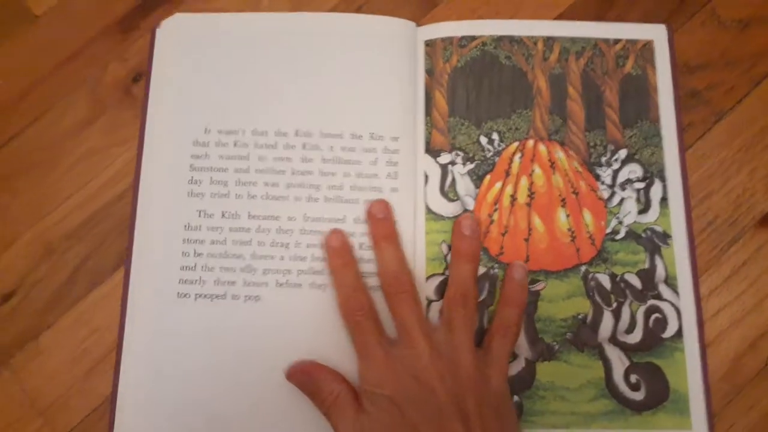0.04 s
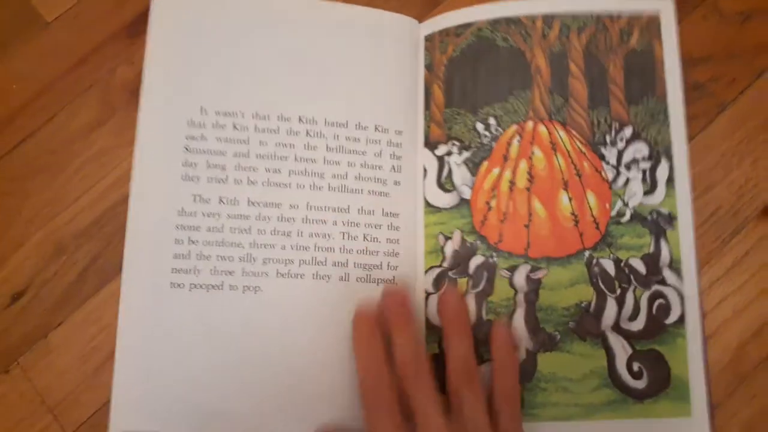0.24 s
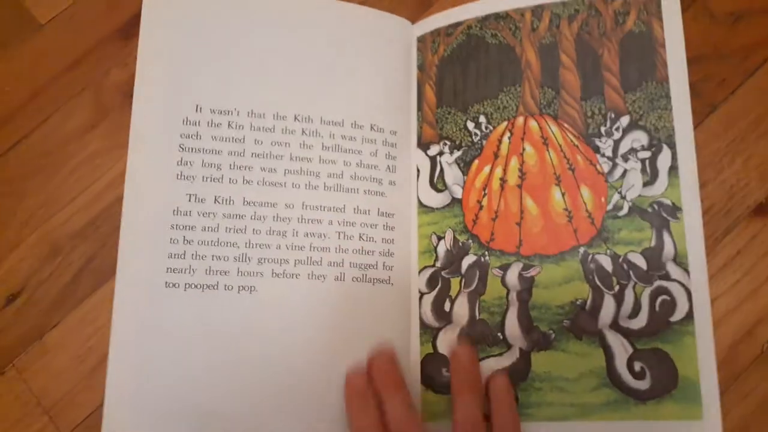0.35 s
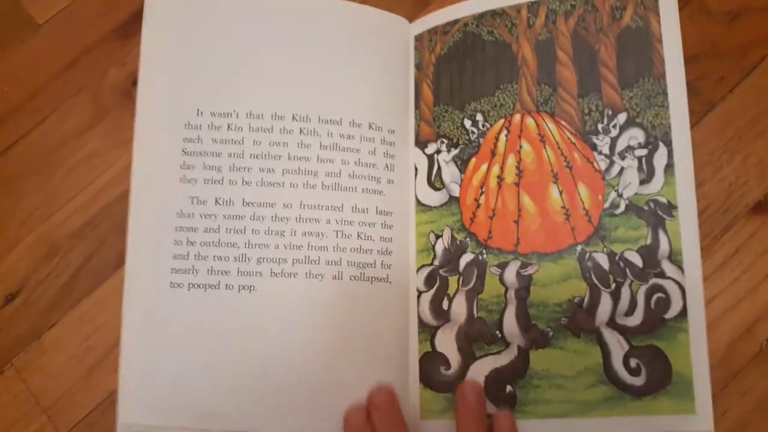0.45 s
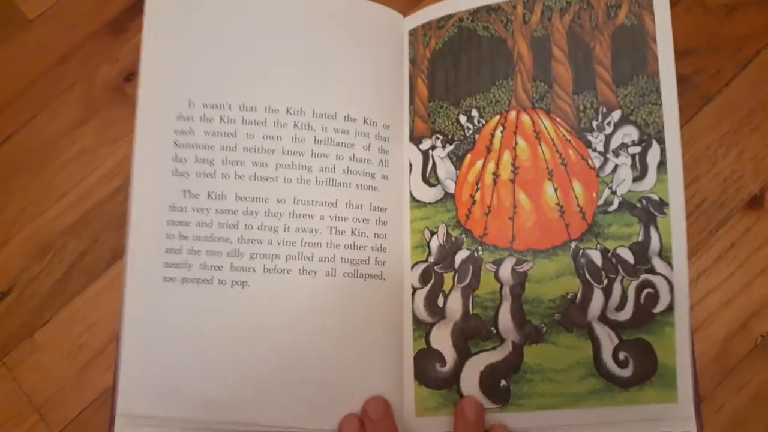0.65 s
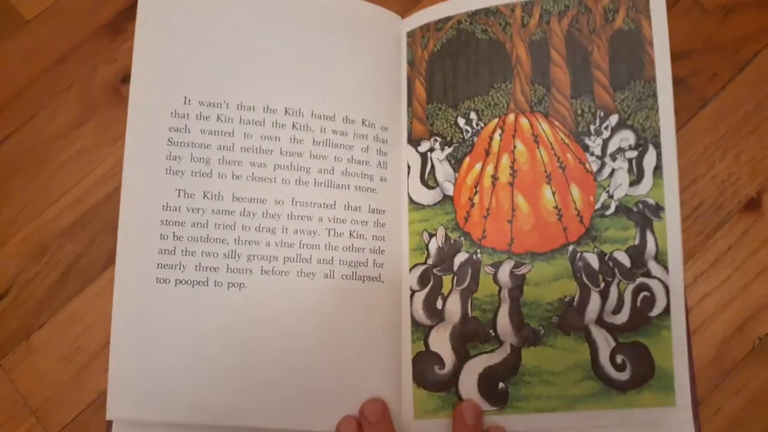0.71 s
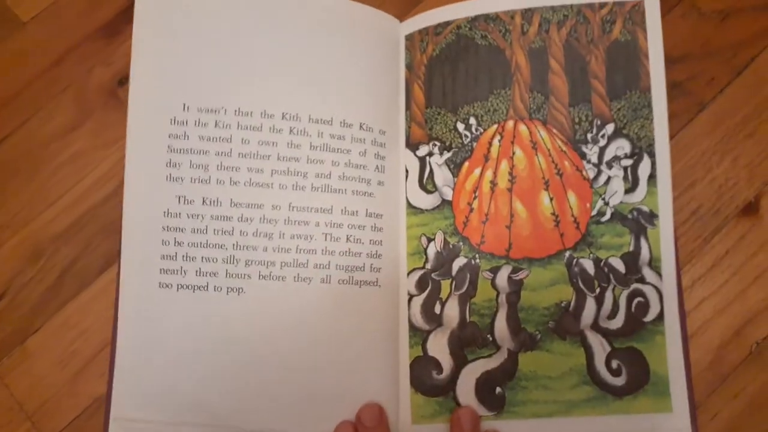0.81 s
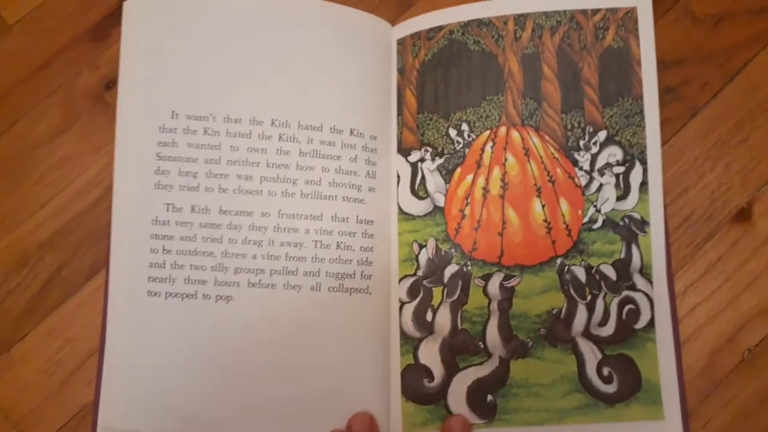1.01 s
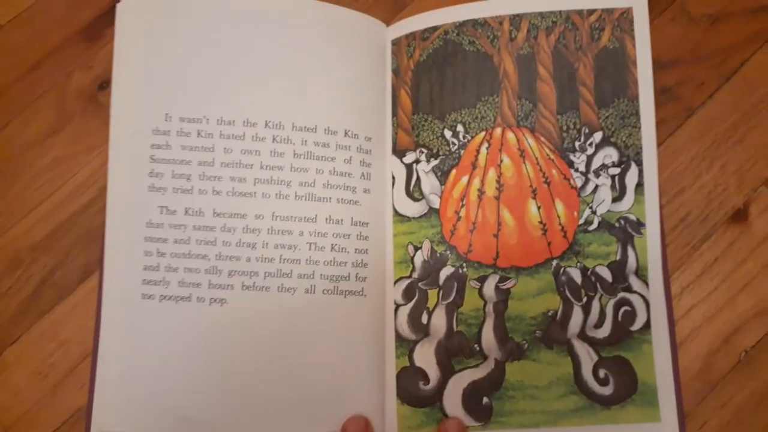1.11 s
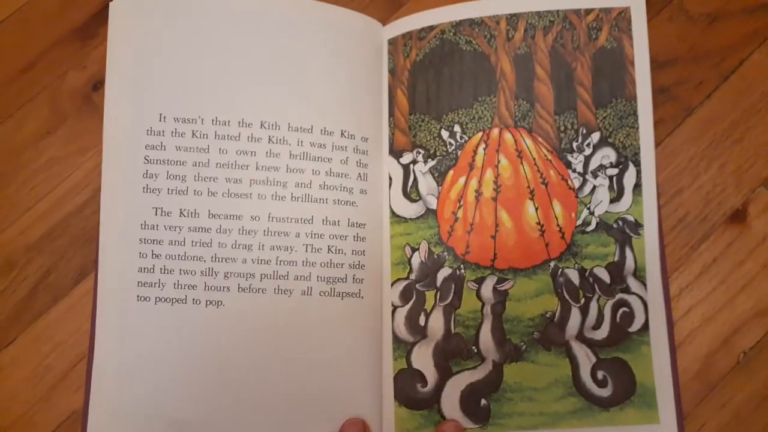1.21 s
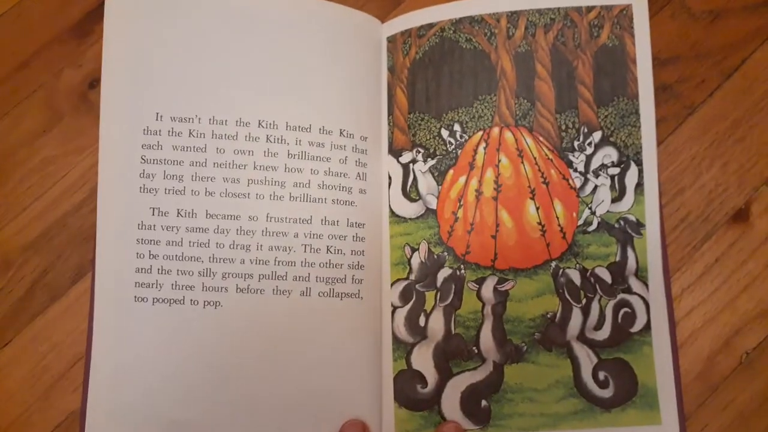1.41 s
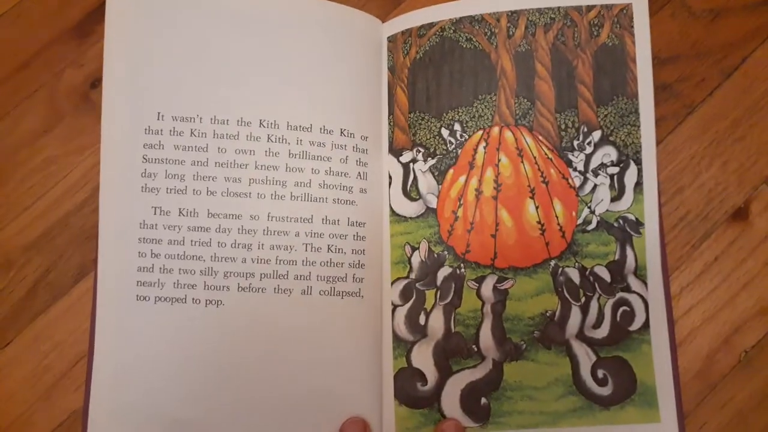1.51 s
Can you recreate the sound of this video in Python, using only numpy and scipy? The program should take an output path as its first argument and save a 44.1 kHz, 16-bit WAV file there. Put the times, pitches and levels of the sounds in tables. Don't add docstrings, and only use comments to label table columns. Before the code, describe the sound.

Close up in a small quiet room, a brief skin-on-paper swish carries two main hollow book thumps with page slaps, followed by a faint shift, small plastic ticks at left and a soft final creak over distant appliance hum.

```python
import sys
import numpy as np
from scipy import signal
from scipy.fft import rfft, irfft
from scipy.io import wavfile

SR = 44100
rng = np.random.default_rng(int(sys.argv[2]) if len(sys.argv) > 2 else 0)


def undo_db(level):
    steps = np.asarray(level, float) / 20
    return 10 ** steps


def dump_mix(stems):
    frames = np.atleast_2d(stems).T
    limited = np.clip(frames, -1, 1)
    pcm = np.round(limited * 32767).astype(np.int16)
    wavfile.write(sys.argv[1], SR, pcm)


N = 68355
HZ = np.maximum(np.fft.rfftfreq(N, 1 / SR), 1)

# added to
# the modes well above 900 Hz, taken from those well below.
KNOCKS = [(0.001, -53, 2580, 0), (0.039, -48.5, 3460, 5), (0.0558, -36, 2120, -4), (0.059, -47.5, 4500, -8),
          (0.08, -46.5, 2560, -1), (0.1612, -36.5, 800, -6.5), (0.198, -44, 1184, -6),
          (0.2015, -36, 1100, 7), (0.2299, -13.5, 2300, 2), (0.2335, -15.5, 660, -12.5),
          (0.2366, -13, 3010, 8.5), (0.2549, -18.5, 1580, -2), (0.265, -31, 990, -13),
          (0.272, -25, 1310, -0.5), (0.3162, -13, 1100, 6), (0.3205, -24.5, 1060, 7),
          (0.328, -37, 1800, 9.5), (0.333, -29, 1810, 0.5), (0.369, -37, 1020, 5), (0.3755, -31, 970, 10.5),
          (0.386, -45, 1200, 3), (0.398, -44, 1190, 6), (0.679, -42, 1220, -0.5)]


def rms_one(x):
    return x / np.sqrt(np.mean(x ** 2) + 1e-20)


def at_hz(points):
    hz, value = np.transpose(points)[:2]
    return np.interp(np.log(HZ), np.log(hz), value)


def coloured(x, gain):
    return irfft(rfft(x) * gain, N)


def left_right(db):
    return undo_db([[db / 2], [-db / 2]])


def high_pass(x, order, hz):
    return signal.sosfilt(signal.butter(order, hz, "high", fs=SR, output="sos"), x)


def drift(rate_hz):
    r = np.exp(-2 * np.pi * rate_hz * 40 / SR)
    noise = rng.standard_normal(N // 40 + 2002)
    slow = signal.lfilter([1], [1, -2 * r, r * r], noise)[2000:]
    return np.interp(np.arange(N) / 40, np.arange(len(slow)), rms_one(slow))


def ring(clicks, hz, t60):
    r = undo_db(-60 / (t60 * SR))
    w = 2 * np.pi * hz / SR
    return signal.lfilter([0, np.sin(w)], [1, -2 * r * np.cos(w), r * r], clicks + 1e-18)


def contact(s, db, cut_hz):
    click = np.zeros(N)
    click[min(int(s * SR), N - 1)] = undo_db(db)
    r = np.exp(-2 * np.pi * cut_hz / SR)
    return signal.lfilter([(1 - r) ** 2], [1, -2 * r, r * r], click + 1e-18)


def struck(rows, modes, rise_s, spread_db):
    hits = np.array([contact(s, db, cut_hz) for s, db, cut_hz, _ in rows])
    octaves = np.clip(np.log2(np.array(modes)[:, 0] / 900), -0.2, 0.2) * 5
    lean_db = np.outer([row[3] for row in rows], octaves)
    chance_db = spread_db * rng.standard_normal((len(rows), len(modes)))
    drive = undo_db(lean_db + chance_db).T @ hits
    swell = 1 / (np.log(1000) * rise_s)
    tracks = []
    for x, mode in zip(drive, modes):
        hz, db, t60 = mode[:3]
        rise = ring(x, hz, 1 / (1 / t60 + swell))
        tracks.append(undo_db(db) * (ring(x, hz, t60) - rise))
    return np.array(tracks)


def room(x):
    t60_s, high_t60_s, wall_cut_hz, build_s = 0.34, 0.24, 1200, 0.0083
    likeness = 0.55
    t = np.arange(SR // 2) / SR
    shared, left, right = rng.standard_normal((3, SR // 2))
    echoes = np.sqrt(likeness) * shared + np.sqrt(1 - likeness) * np.array([left, right])
    low = signal.sosfilt(signal.butter(1, wall_cut_hz, fs=SR, output="sos"), echoes)
    dying = low * undo_db(-60 * t / t60_s) + (echoes - low) * undo_db(-60 * t / high_t60_s)
    dying = dying * np.clip(t / build_s, 0, 1)
    return signal.fftconvolve(x[None], dying / np.sqrt(0.03 * SR), axes=1)[:, :N]


def air(spectrum, db, lead_rad):
    # frequency in Hz, left-right balance in dB.
    air_side = [(60, -5), (130, 7.5), (290, -11), (640, -3), (1410, -11.5), (3100, -1.5), (6820, -4),
                (15000, 0.5)]
    # frequency in Hz, likeness of the two microphones from 0 to 1.
    likeness = [(60, 1), (180, 0.85), (550, 0.91), (1650, 0), (4970, 0.25), (15000, 0.08)]
    mid, side = rng.standard_normal((2, N))
    alike = np.clip(at_hz(likeness), 0, 0.99)
    pair = []
    for sign in (1, -1):
        gain = undo_db(at_hz(spectrum)) * undo_db(sign * at_hz(air_side) / 2)
        common = coloured(mid, gain * np.sqrt(1 + alike) * np.exp(0.5j * sign * lead_rad))
        pair.append(common + sign * coloured(side, gain * np.sqrt(1 - alike)))
    return undo_db(db) * rms_one(np.array(pair))


def rumble():
    # frequency in Hz, density in dB per Hz.
    rumble_spectrum = [(25, -29.5), (55, -5), (90, 4), (135, -9.5), (290, -7.5), (400, -15), (950, -14.5),
                       (1700, -58.5)]
    return air(rumble_spectrum, db=-57.5, lead_rad=0.78) * undo_db(1 * drift(9.5))


def high_air():
    # frequency in Hz, density in dB per Hz.
    air_spectrum = [(600, -31), (1100, 0.5), (1400, -6), (2300, -11), (3000, -14.5), (8000, -30),
                    (12000, -22.5), (16000, -18)]
    return air(air_spectrum, db=-72, lead_rad=0)


def hum():
    # frequency in Hz, rms level in dB, wander in dB, left-right balance in dB,
    # lead of the left microphone in radians.
    tones = [(103.2, -57.5, .8, 0, .6), (207, -68.5, 1.5, -3, .3), (276, -73, 1.2, -2, .3),
             (414, -77, 1.5, -4, .3), (620, -79, 1.5, -4, .3), (1017.6, -74, .4, -9, .3)]
    # time in seconds, rms level of the load tone in dB.
    load = [(0.0, -69), (0.112, -57.5), (0.358, -66.5), (0.388, -73), (0.574, -70.5), (0.594, -82),
            (0.682, -64), (0.702, -75), (1.112, -62), (1.164, -82), (1.234, -58.5), (1.32, -77),
            (1.364, -65.5), (1.55, -68.5)]
    load_hz, load_gain_db = 307.5, 3.5
    t = np.arange(N) / SR
    out = 0
    for hz, db, wander_db, side_db, lead in tones:
        turn = 2 * np.pi * hz * t + 0.2 * wander_db * drift(2)
        level = undo_db(db + 2 + wander_db * drift(1.9))
        out = out + level * left_right(side_db) * np.sin([turn + lead, turn])
    load_level = undo_db(load_gain_db + np.interp(t, *np.transpose(load)))
    load_tone = np.sin(2 * np.pi * load_hz * t + 0.83 * drift(2.7))
    return out + load_level * undo_db([[-1], [1]]) * load_tone


def casing():
    # start in seconds, peak in dB.
    tick_rows = [(.018, -68), (.027, -68), (.483, -68), (.528, -63), (.534, -63), (.54, -64), (.551, -68),
                 (.572, -64), (.589, -68), (.674, -62), (.69, -63), (.777, -69), (.879, -66), (.948, -69),
                 (1.186, -65), (1.202, -66), (1.288, -65), (1.304, -67), (1.33, -66), (1.391, -68),
                 (1.458, -66), (1.465, -62), (1.471, -66), (1.492, -61), (1.498, -60), (1.504, -64),
                 (1.526, -61), (1.532, -59), (1.538, -63), (1.547, -61)]
    # frequency in Hz, level in dB, t60 in seconds.
    plastic = [(1300, -10, .003), (1900, -7, .003), (2400, -2, .005), (3000, -3, .004), (3700, -3, .004),
               (5200, -7, .003), (6300, -8, .003), (8000, -14, .003)]
    creak_from_s, creak_db = 1.45, 4
    tick_cut_hz, creak_cut_hz = 9000, 3200
    tick_db, right_db, room_db = 3.5, -35, -8
    rows = []
    for s, db in tick_rows:
        if s > creak_from_s:
            rows.append((s, db + creak_db, creak_cut_hz, 0))
        else:
            rows.append((s, db, tick_cut_hz, 0))
    tracks = struck(rows, plastic, rise_s=0.00016, spread_db=7)
    ticks = tracks.sum(axis=0) * undo_db(tick_db)
    return ticks * undo_db([[0], [right_db]]) + undo_db(room_db) * room(ticks)


def thuds():
    # start in seconds, peak in dB, frequency in Hz.
    pushes = [
        (0.159, -50, 260),
        (0.234, -36, 184),
        (0.264, -46, 291),
        (0.292, -45, 156),
        (0.31, -42, 272),
        (0.329, -43.5, 99.4),
        (0.338, -42.5, 184),
        (0.344, -48.5, 72.3),
        (0.802, -42.5, 175.6),
        (0.806, -49, 251),
    ]
    rise_cycles, t60_cycles = 1.17, 15.3
    low = 0
    for s, db, hz in pushes:
        cycles = np.maximum(np.arange(N) / SR - s, 0) * hz
        swell = 1 - np.exp(-cycles / rise_cycles)
        low = low + undo_db(db + 2 - 60 * cycles / t60_cycles) * swell * np.sin(2 * np.pi * cycles)
    return low * left_right(-3)


def slide():
    # time in seconds, hiss level in dB, top-end lift in dB.
    palm = [
        (0.025, -98, -3),
        (0.082, -71.5, -4),
        (0.12, -66.5, -2),
        (0.185, -64, -1),
        (0.31, -63, 1),
        (0.425, -68, 1),
        (0.49, -75, -2),
        (0.59, -85, -6),
        (0.65, -96, -6),
    ]
    # start in seconds, decay in seconds, level in dB.
    shifts = [
        (0.668, 0.068, -75.5),
        (0.836, 0.06, -83.5),
    ]
    # frequency in Hz, density in dB per Hz.
    skin = [(900, -20), (1500, -7), (3500, -6.5), (6800, -6.5), (7800, -3.5), (11500, -2), (14000, -1.5),
            (16000, -9.5)]
    # frequency in Hz, left minus right in dB.
    skin_side = [(1500, -5), (3500, -12), (5800, -9), (7200, -36), (8800, -40), (11000, -30), (16000, -40)]
    slide_db, shift_attack_s, top_hz = 5, 0.013, 11700
    grains_per_s, grain_spread_db, flutter_db = 26000, 1.5, -0.05
    t = np.arange(N) / SR
    when, speed_db, top_db = np.transpose(palm)
    level = undo_db(slide_db + np.interp(t, when, speed_db, right=-120))
    for s, decay_s, db in shifts:
        attack = np.clip((t - s) / shift_attack_s, 0, 1)
        level = level + undo_db(db) * attack * np.exp(-np.maximum(t - s, 0) / decay_s)
    slips = rng.random((2, N)) < grains_per_s / SR
    strength = undo_db(grain_spread_db * rng.exponential(1, (2, N)))
    grains = slips * rng.standard_normal((2, N)) * strength
    hiss = rms_one(coloured(grains, undo_db(at_hz(skin)) * (HZ > 600)))
    hiss[0] = coloured(hiss[0], undo_db(at_hz(skin_side)))
    top = coloured(hiss, 1 / (1 + (top_hz / HZ) ** 10))
    hiss = hiss + (undo_db(np.interp(t, when, top_db)) - 1) * top
    return 2 * hiss * level * undo_db(flutter_db * drift(20))


def slap():
    # frequency in Hz, density in dB per Hz.
    slap_spectrum = [(900, -1), (1800, 6.5), (2800, -3), (4200, -12), (5500, -17.5), (7000, -24),
                     (11000, -26), (16000, -46)]
    # frequency in Hz, left minus right in dB.
    slap_side = [(2000, -2), (4500, -6), (6500, -8), (8000, -34), (16000, -34)]
    slap_db, attack_s, t60_s = -15, 0.00072, 0.045
    clicks = np.zeros(N)
    for s, db, cut_hz, _ in KNOCKS:
        clicks[int(s * SR)] += undo_db(db) * (cut_hz / 2500) ** 2
    attack = 1 / (attack_s * SR)
    clicks = signal.lfilter([attack], [1, attack - 1], clicks + 1e-18)
    envelope = signal.lfilter([1], [1, -undo_db(-60 / (t60_s * SR))], clicks + 1e-18)
    noise = rms_one(coloured(rng.standard_normal((2, N)), undo_db(at_hz(slap_spectrum))))
    noise[0] = coloured(noise[0], undo_db(at_hz(slap_side)))
    return undo_db(slap_db) * noise * envelope


def book():
    # frequency in Hz, level in dB, t60 in seconds,
    # left-right balance in dB.
    board_modes = [(442, -22.5, 0.05, -2), (505, -16, 0.031, -1), (591, -26, 0.13, 8),
                   (680, -26.5, 0.1, -1), (808.5, 2.5, 0.03, -4), (882, -9.5, 0.065, -1),
                   (1017, 0, 0.035, -10), (1287, -0.5, .011, -17.5), (1419, -12.5, 0.035, -10),
                   (1634, -13.5, 0.028, -22.5), (1729, -13.5, 0.029, -12), (1920, -20, 0.027, -14),
                   (2105, -20.5, 0.033, -3), (2630, -14.5, 0.018, -5)]
    knock_db, low_hz, room_db = -8.5, 390, -5
    even, even_at_db = 0.45, -9
    wall_lift = 0.768
    tracks = struck(KNOCKS, board_modes, rise_s=0.00066, spread_db=1.45)
    modes = undo_db(knock_db) * high_pass(tracks, 3, low_hz)
    _, mode_db, _, side_db = np.transpose(board_modes)
    air_burst = slap()
    near = np.array([undo_db(side_db / 2) @ modes, undo_db(-side_db / 2) @ modes]) + air_burst
    far = undo_db(even * (even_at_db - mode_db)) @ modes
    far = signal.lfilter([1, -wall_lift], [1 - wall_lift], far) + air_burst[1]
    return near + undo_db(room_db) * room(far) * left_right(-5)


def scene():
    background = rumble() + high_air() + hum()
    return background + casing() + thuds() + slide() + book()


def top_cut(x):
    return signal.sosfilt(signal.butter(12, 15860, fs=SR, output="sos"), x)


def record(dry):
    mix = coloured(high_pass(dry, 2, 40.3), HZ < 15860)
    return top_cut(mix)


dry = scene()
out = record(dry)
dump_mix(out)
```